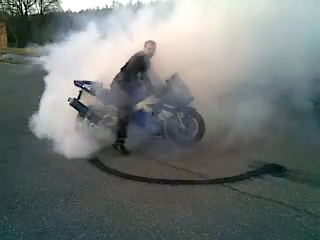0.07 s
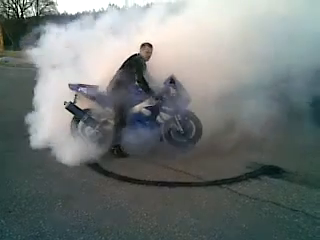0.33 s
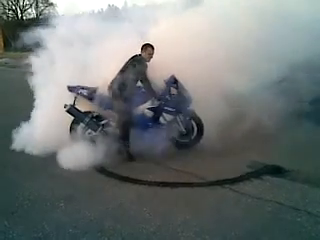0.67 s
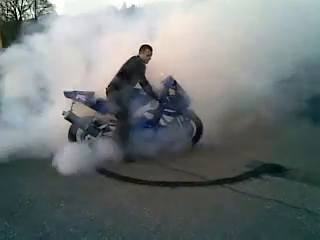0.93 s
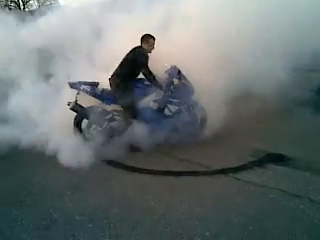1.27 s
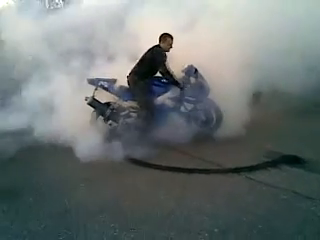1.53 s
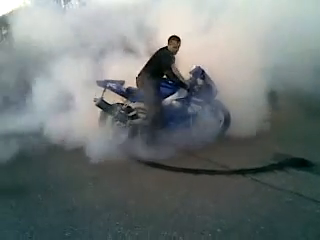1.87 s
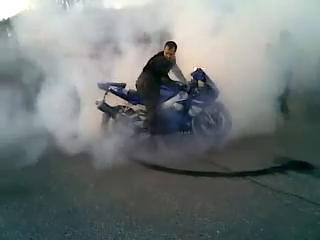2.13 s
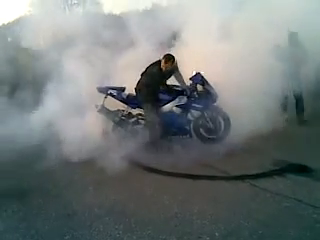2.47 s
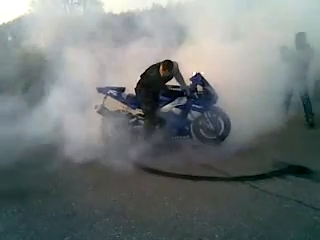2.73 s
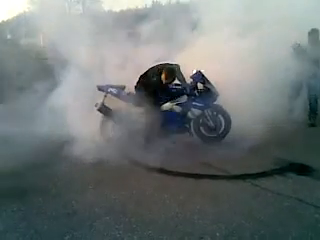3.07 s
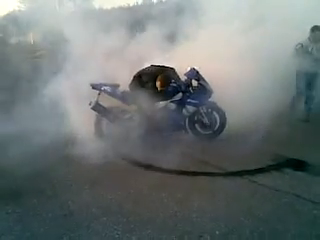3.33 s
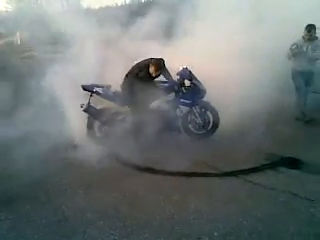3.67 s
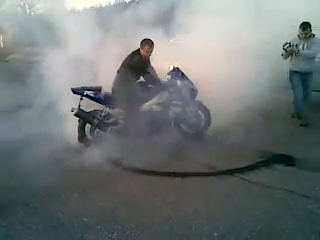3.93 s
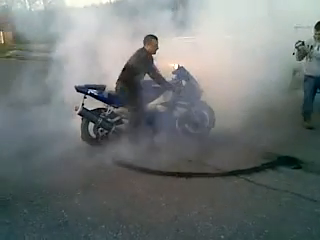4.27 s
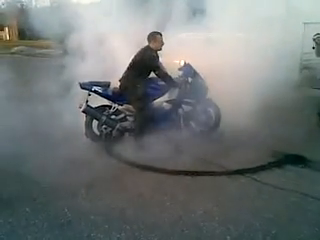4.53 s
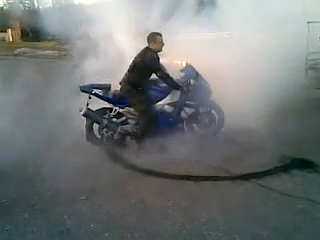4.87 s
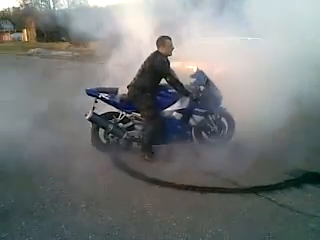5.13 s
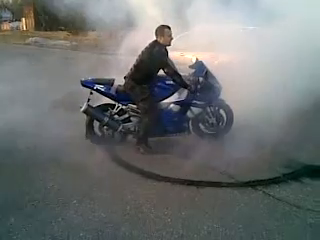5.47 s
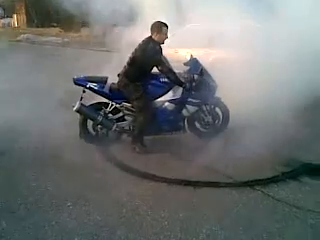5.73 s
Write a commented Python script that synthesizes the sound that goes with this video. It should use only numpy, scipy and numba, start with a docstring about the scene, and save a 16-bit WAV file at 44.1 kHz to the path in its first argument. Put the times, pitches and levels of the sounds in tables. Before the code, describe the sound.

A motorcycle engine races at high revs while its spinning tyre hisses, squeals hoarsely and rasps rhythmically on asphalt. Within a second the tyre bursts with a very loud bang and a jet of air, and the empty rubber briefly slaps the road. The engine gets two small throttle blips, then winds down to a quieter, lumpy idle. It is outdoors, with a faint low rumble, and the bang overloads the microphone.

```python
"""A tyre scrubs on asphalt over a racing four-cylinder engine: a motorcycle is doing a burnout.
The sliding rubber hisses and squeals, and a worn patch rasps on every wheel turn. Then the tyre bursts:
air jets out with a bang that overloads the microphone, and the empty rubber slaps the road.
The engine's firings boom in the exhaust and make its metal parts clatter. It gets two small blips
of throttle and sinks to a lumpy idle, over a faint outdoor rumble."""
import sys
import numpy as np
from scipy import signal
from scipy.fft import rfft, irfft
from scipy.io import wavfile
from scipy.ndimage import uniform_filter1d
from numba import njit

SR = 44100
rng = np.random.default_rng(int(sys.argv[2]) if len(sys.argv) > 2 else 0)


def to_wav(s):
    """Save 16-bit WAV."""
    ch = np.atleast_2d(s).T  # columns
    pcm = np.round(np.clip(ch, -1, 1) * 32767)  # PCM
    wavfile.write(sys.argv[1], SR, pcm.astype(np.int16))


N = 264600
TIME = np.arange(N) / SR

# tone of the sliding rubber: f/Hz, level/dB
SCRUB_SPECTRUM = [(100, -18), (400, -20.5), (700, -3.5), (1100, -3.5), (1550, -1.5), (2250, -2.5),
                  (2900, -15), (3900, -3.5), (4500, -9.5), (5400, -3.5), (6800, -15.5), (8500, -9),
                  (10300, -23), (15000, -25.5)]
# tone of the worn patch scraping the road: f/Hz, level/dB
RASP_SPECTRUM = [(300, -14), (1800, -2), (3000, -7), (5400, -1), (6800, -4), (8300, 1), (10300, -16),
                 (12500, -16), (15500, -24)]
# hard knocks of the tread on the road: t/s, level/dB
TREAD_KNOCKS = [(.24, -29), (.43, -30.5), (.968, -33), (1.088, -25), (1.408, -32)]
# pressure waves of the burst: t/s, f/Hz, time to fade by 60 dB/s, level/dB, push (1) or pull (-1)
PRESSURE_WAVES = [(.845, 50, 0.021, -3, -1), (0.861, 140, 0.091, -3, 1), (0.894, 75, 0.035, 5.5, 1),
                  (0.903, 18, 0.072, -4, -1)]
# tone of the air escaping from the tyre: f/Hz, level/dB
JET_SPECTRUM = [(60, -36), (400, 10.5), (2000, 3), (3200, -5.5), (5500, -3), (8500, -8),
                (11000, -15.5), (15500, -23)]
# engine speed as firings a second: t/s, f/Hz
FIRING_RATE = [(0.0, 196.2), (0.27, 195.7), (0.35, 202.7), (0.97, 213.7), (1.42, 187.8), (1.45, 190.1),
               (1.57, 220.8), (1.74, 172.1), (1.75, 171.7), (1.87, 196.4), (1.95, 184.7), (2.09, 205.6),
               (2.32, 229.8), (2.37, 227.8), (2.56, 171.9), (2.91, 108.7), (3.12, 85.8), (3.31, 76.3),
               (3.51, 70.8), (4.5, 67.7), (4.91, 68.97), (6.0, 62.6)]
# the silencer's boom at each firing rate: f/Hz, first harmonic level/dB, second harmonic level/dB
BOOM_LEVELS = [(63.2, -41.5, -41), (68.6, -39, -46.5), (77, -42, -54), (108, -38, -58), (160, -41.5, -50),
               (196, -37, -51), (213, -43.5, -53), (230, -50, -43)]
# tone of the exhaust pipe: f/Hz, level/dB
PIPE_SPECTRUM = [(200, -9), (280, -9), (400, -12), (520, -7), (640, 0), (720, 0), (810, -4), (920, -1),
                 (1030, -2), (1180, -15), (1400, -6), (1650, -5.5), (2250, -8), (3200, -23)]
# tone of the rushing exhaust gas: f/Hz, level/dB
GAS_SPECTRUM = [(1000, -34), (2000, -53), (2700, 2), (3600, -6.5), (5500, -3), (7000, -12),
                (9500, -23), (12000, -37)]
# tone of the engine's moving parts: f/Hz, level/dB
CLATTER_SPECTRUM = [(150, -11), (400, -16.5), (600, -4), (1000, -5.5), (1150, -12), (1400, 1), (1900, -7),
                    (2300, -4), (3100, -20), (5600, -10), (7200, -26), (9000, -18.5), (11500, -34.5),
                    (15500, -37)]
# pitches at which the engine casings ring: f/Hz, width/Hz, level/dB
CASING_RINGS = [(594, 330, -10), (814, 56, -3.5), (1037, 34, 2), (1296, 110, 3.5), (1505, 49, 1),
                (1637, 72, 2), (2190, 360, -0.5)]
# the engine gets louder as the listener comes closer: t/s, level/dB
ENGINE_NEARNESS = [(3.6, -2.5), (5, 0)]
# soft thumps as the throttle shuts and opens: t/s, level/dB
THROTTLE_THUMPS = [(1.885, -45), (1.925, -39.5), (2.389, -36), (2.55, -39)]
# tone of the outdoor rumble: f/Hz, level/dB
RUMBLE_SPECTRUM = [(25, -17), (45, 0.5), (110, -6.5), (200, -13.5), (400, -21), (1500, -21.5), (5000, -49),
                   (15000, -47.5)]

SPIN_ENDS_S, SPIN_T60_S = 1.437, 0.76  # a "t60" is the time a sound takes to fade by 60 dB
CRACK_S, RIP_S, RIP_ENDS_S = .8445, .855, .8925  # the tyre cracks, then rips wide open


def tyre_scrub(firings, spin, level_db=-28, squeal_db=-9):
    """Rubber tears over the grit, pushed by each firing, with a hoarse wandering squeal."""
    slip = noise() * undb(1.4 * wander(900) + 0.92 * wander(50.05))
    slip *= 1 + 0.057 * np.cos(2 * np.pi * firings)
    squeal_hz = 1550 * np.exp(0.077 * wander(26.02))
    squeal = ring_twice(noise(), squeal_hz, 250)
    return undb(level_db) * spin * (colour(slip, SCRUB_SPECTRUM) + undb(squeal_db) * squeal)


def worn_patch(firings, spin, firings_per_turn=12.57, first_touch_s=.047, rasp_s=0.0057, thud_s=0.015):
    """A worn patch rasps and thuds once a turn, the far side rasps more softly, and the tread knocks."""
    wheel_turns = (firings - np.interp(first_touch_s, TIME, firings)) / firings_per_turn
    last_turn = np.interp(SPIN_ENDS_S + SPIN_T60_S / 2, TIME, wheel_turns)
    patch_times = np.interp(np.arange(0, last_turn), wheel_turns, TIME)
    far_side_times = np.interp(np.arange(.5, last_turn), wheel_turns, TIME)
    rasp = sum(swell(s, rasp_s) for s in patch_times)
    rasp += undb(-5) * sum(swell(s, rasp_s) for s in far_side_times)
    rasp *= spin * undb(-22.5 - 4 * TIME + 1.06 * wander(16.5))  # softer as the rubber wears
    rasp += sum(undb(db - 3) * swell(s, .003) for s, db in TREAD_KNOCKS)
    thud = undb(-40) * spin * sum(swell(s, thud_s) for s in patch_times)
    thud += sum(undb(db) * swell(s, thud_s) for s, db in TREAD_KNOCKS)
    return rasp * colour(noise(), RASP_SPECTRUM) + thud * ring(noise(), 53, 114)


def blowout(attack_s=0.0012, snap_t60_s=0.0061, slow_hz=370, fast_hz=1550):
    """The tyre rips: a jet of air, torn rubber fluttering in it, and slow waves of pressure."""
    jet = colour(noise(), JET_SPECTRUM)
    crack = undb(-11) * held(CRACK_S, CRACK_S + 0.0057, attack_s, snap_t60_s)
    rip = undb(-5) * held(RIP_S, RIP_S + 0.021, attack_s, t60_s=0.13)
    blast = swell(.882, width_s=.009)
    flutter_hz = slow_hz + (fast_hz - slow_hz) * blast  # fastest at the height of the blast
    flutter = np.sin(2 * np.pi * np.cumsum(flutter_hz * np.exp(.2 * wander(900))) / SR)
    flutter_gain = undb(-4 + 7 * np.sqrt(blast)) * held(RIP_S, RIP_ENDS_S, attack_s, snap_t60_s)
    bang = (crack + rip) * jet + flutter_gain * flutter
    for s, hz, t60, db, direction in PRESSURE_WAVES:
        age = np.maximum(TIME - s, 0)
        bang += direction * undb(db) * np.sin(2 * np.pi * hz * age) * np.exp(-np.log(1000) * age / t60)
    return bang


def flat_tyre(flat_s=1.174, end_s=1.531, collapse_s=0.25, slaps_per_s=95, octaves_per_s=1.4):
    """Folds of the empty tyre slap the road and drum in its hollow, rising in pitch as it collapses."""
    age = np.clip(TIME, flat_s - collapse_s, end_s) - flat_s
    hollow_hz = 204 * 2 ** (octaves_per_s * age) * np.exp(.13 * wander(45))
    folds = np.cumsum(slaps_per_s * np.exp(.5 * wander(110))) / SR
    slaps = np.diff(np.floor(folds), prepend=0) * undb(3 * wander(40))  # each fold is a different size
    drumming = ring(ring(slaps, hollow_hz, 110), hollow_hz, 200)
    return undb(-31.5) * held(flat_s, end_s, collapse_s, t60_s=0.16) * drumming


def engine(firings, firing_hz, spin, idle_hz=68, sing_hz=212):
    """Speed and throttle set how loudly the exhaust booms and sings and the moving parts clatter."""
    octaves = np.log2(firing_hz / idle_hz)
    opening = throttle(firing_hz)  # opening it hardens the note: less boom, more clatter
    rates, *boom_columns = np.transpose(BOOM_LEVELS)
    first_db, second_db = (np.interp(firing_hz, rates, db) for db in boom_columns)
    # near top speed the pipe sings out louder
    singing = np.clip((firing_hz - sing_hz) / (firing_hz.max() - sing_hz), 0, 1)
    pipe_db = -63 + 16.5 * octaves - 0.5 * opening + 2.5 * singing
    shake = swell(1.165, width_s=0.21)  # the collapsing tyre shakes the machine
    clatter_db = -52 + 6.8 * octaves + 2.4 * opening + 10.5 * shake
    sound = exhaust(firings, firing_hz, first_db - 5.5 * opening, second_db, pipe_db)
    sound += pipe_howl(firings, firing_hz, spin)
    sound += gas_rush(firings, pipe_db)
    sound += clatter(firings, clatter_db)
    return undb(curve(ENGINE_NEARNESS)) * sound


def throttle(firing_hz, smooth_s=.18):
    """From -1 (shut, the engine slows) to 1 (open, it speeds up)."""
    octaves_per_s = uniform_filter1d(np.gradient(np.log2(firing_hz)) * SR, int(smooth_s * SR))
    return np.tanh(octaves_per_s / 1.5)


def exhaust(firings, firing_hz, first_db, second_db, pipe_db):
    """Firings make a deep boom and, in the pipe, a stack of harmonics (multiples of the firing rate)."""
    idling = np.clip((110 - firing_hz) / 40, 0, 1)
    # the cylinders burn unevenly, most of all at idle, and now and then one is weak
    weakness = np.minimum(rng.exponential(size=2000), 3) - 1
    strength = 1 - (.07 + .26 * idling) * np.interp(firings, np.arange(len(weakness)), weakness)
    angle = 2 * np.pi * firings
    boom = undb(first_db) * np.sin(angle) + undb(second_db) * np.sin(2 * angle)
    pipe = 0
    for multiple in np.arange(2.5, 14, .5):
        # unequal cylinders add tones halfway between the harmonics, at full strength from 1100 Hz up
        tone_hz = multiple * firing_hz
        share = np.minimum(tone_hz / 1100, 1) ** 4 if multiple % 1 else 1
        tone = np.sin(multiple * angle + rng.uniform(0, 2 * np.pi)) * undb(2 * wander(30))
        pipe += share * gain_at(tone_hz, PIPE_SPECTRUM) * tone
    drone = idling * (undb(-60) * np.sin(3 * angle) + undb(-55) * np.sin(4 * angle))
    burble = undb(-51) * ring_twice(noise(), 105, 60)  # uneven puffs ring the silencer
    return strength * (np.sqrt(2) * boom + undb(pipe_db) * unit(pipe) + idling * (drone + burble))


def pipe_howl(firings, firing_hz, spin, pipe_hz=625, width_hz=55, deflate_s=0.59):
    """Straining against the tyre's drag, the third harmonic rings the pipe until the tyre goes flat."""
    inflated = np.exp(-np.maximum(TIME - CRACK_S, 0) / deflate_s)
    in_tune = 1 / np.hypot(1, (3 * firing_hz - pipe_hz) / width_hz)
    gain = spin * inflated * in_tune * undb(-37.5 + 2.5 * wander(60))
    return gain * np.sin(3 * 2 * np.pi * firings + .4 * wander(120))


def gas_rush(firings, pipe_db):
    """Gas rushes from the silencer, one puff for each firing."""
    puffs = noise() * (1 + .5 * np.cos(2 * np.pi * firings))
    return undb(pipe_db - 12.5) * colour(puffs, GAS_SPECTRUM)


def clatter(firings, level_db):
    """Valves, chain and gas tick and hiss with each firing and ring the casings."""
    grain = undb(1.8 * wander(500))
    ticking = noise() * (1 + 0.076 * np.cos(2 * np.pi * firings)) * grain
    casings = unit(sum(undb(db) * ring_twice(ticking, hz, width) for hz, width, db in CASING_RINGS))
    return undb(level_db) * (undb(2) * colour(ticking, CLATTER_SPECTRUM) + undb(-6) * casings)


def throttle_thumps(width_s=0.017):
    """Dull low puffs as the throttle shuts and opens."""
    puffs = sum(undb(db) * swell(s, width_s) for s, db in THROTTLE_THUMPS)
    return puffs * ring(ring(noise(), 105, 53), 102, 54)


def outdoor_rumble(level_db=-51.5):
    """A low rumble that slowly rises and falls."""
    return undb(level_db + 2.3 * wander(2.914)) * colour(noise(), RUMBLE_SPECTRUM)


def undb(db):
    """Turn decibels into a number to multiply by."""
    return 10 ** (np.asarray(db) / 20)


def unit(x):
    """Scale a signal to an average size (rms) of one."""
    return x / np.sqrt(np.mean(x ** 2))


def curve(rows):
    """Join a table's points by straight lines in time."""
    return np.interp(TIME, *np.transpose(rows))


def noise():
    """An even hiss: white noise."""
    return rng.standard_normal(N)


def wander(rate):
    """A smooth random wobble of size one, changing about rate times a second."""
    size = max(int(SR / rate), 1)
    steps = np.repeat(rng.standard_normal(N // size + 1), size)
    return unit(uniform_filter1d(steps, size)[:N])


def gain_at(hz, spectrum):
    """How strong a spectrum is at the given frequencies."""
    f, db = np.transpose(spectrum)
    return undb(np.interp(np.log(np.maximum(hz, 1)), np.log(f), db))


def colour(x, spectrum):
    """Give a sound the tone of a spectrum, at size one."""
    hz = np.arange(N // 2 + 1) * SR / N
    return unit(irfft(rfft(x) * gain_at(hz, spectrum), N))


@njit
def band_pass(x, hz, width_hz):
    """A filter that lets through a band around a pitch that may move."""
    out, band_state, low_state = np.empty(len(x)), 0., 0.
    for i in range(len(x)):
        tuning, damping = np.tan(np.pi * hz[i] / SR), width_hz / hz[i]
        band = (band_state + tuning * (x[i] - low_state)) / (1 + tuning * (tuning + damping))
        band_state = 2 * band - band_state
        low_state += 2 * tuning * band
        out[i] = damping * band
    return out


def ring(x, hz, width_hz):
    """Make a sound ring around one pitch, at size one."""
    return unit(band_pass(x, hz * np.ones(N), float(width_hz)))


def ring_twice(x, hz, width_hz):
    """Ring two times over for a clearer pitch."""
    return ring(ring(x, hz, width_hz), hz, width_hz)


def swell(s, width_s, rise_share=0.64):
    """A short hump around time s that rises faster than it falls."""
    hump = np.zeros(N)
    near = slice(*np.searchsorted(TIME, [s - 5 * width_s, s + 5 * width_s]))
    age = (TIME[near] - s) / width_s
    hump[near] = np.exp(-np.abs(np.where(age < 0, age / rise_share, age)) ** 1.5)
    return hump


def held(start, end, attack_s, t60_s):
    """A loudness shape that rises to one by start, holds until end and dies away."""
    rise = np.clip(1 + (TIME - start) / attack_s, 0, 1)
    return rise * np.exp(-np.log(1000) * np.maximum(TIME - end, 0) / t60_s)


def scene():
    """Tyre and engine in the open air."""
    firing_hz = curve(FIRING_RATE)
    # a running count of firings; the engine never turns quite evenly
    firings = np.cumsum(firing_hz * (1 + .0035 * wander(70))) / SR
    spin = held(0, SPIN_ENDS_S, 1, SPIN_T60_S)  # how hard the tyre slides; fades as the drive eases
    tyre = tyre_scrub(firings, spin) + worn_patch(firings, spin) + blowout() + flat_tyre()
    return (tyre + engine(firings, firing_hz, spin) + throttle_thumps() + outdoor_rumble())[None]


def record(dry):
    """The bang overloads the microphone, and the treble above 15400 Hz is cut."""
    clipped = dry / (1 + np.abs(dry / .95) ** 6) ** (1 / 6)
    return signal.sosfilt(signal.ellip(8, .2, 70, 15400, fs=SR, output="sos"), clipped)


dry = scene()
out = record(dry)
to_wav(out)
```